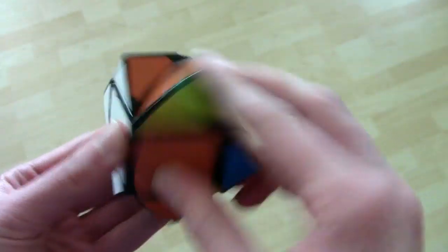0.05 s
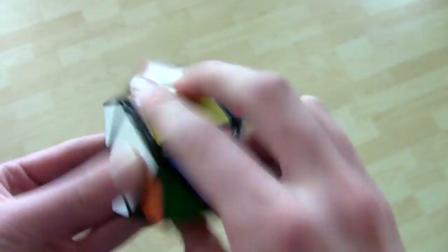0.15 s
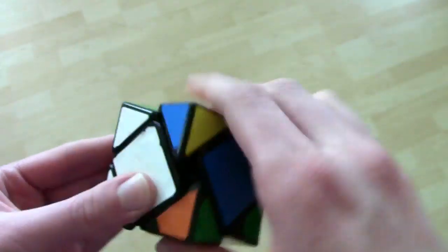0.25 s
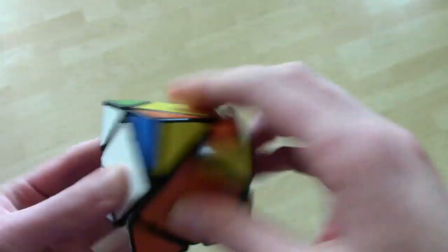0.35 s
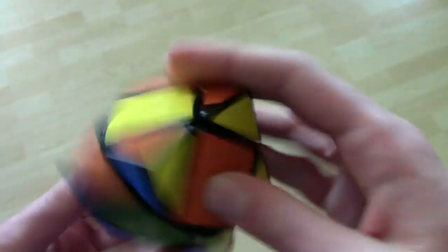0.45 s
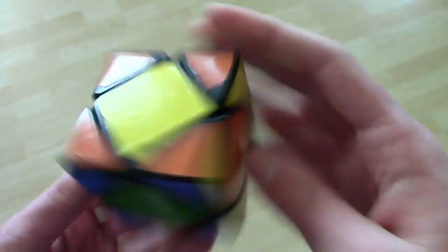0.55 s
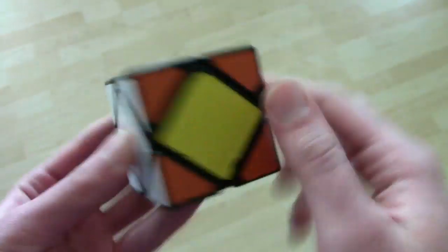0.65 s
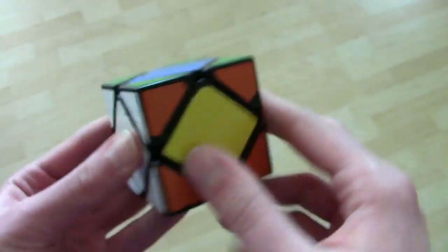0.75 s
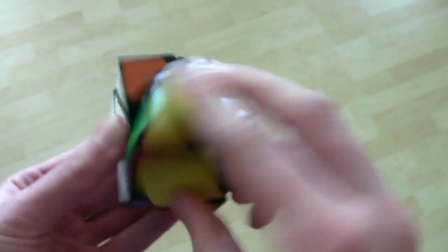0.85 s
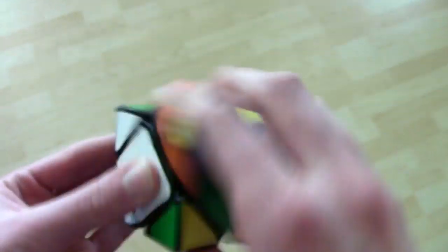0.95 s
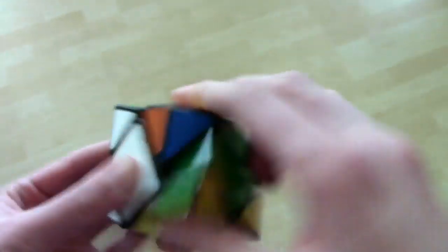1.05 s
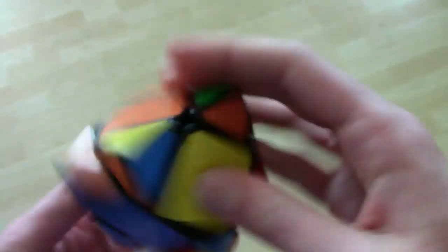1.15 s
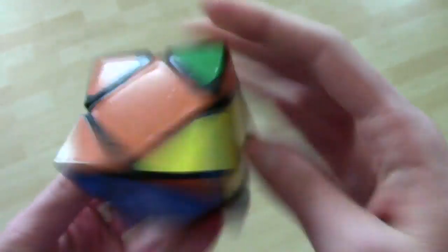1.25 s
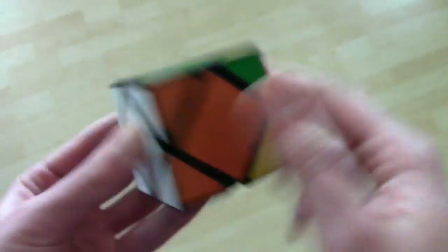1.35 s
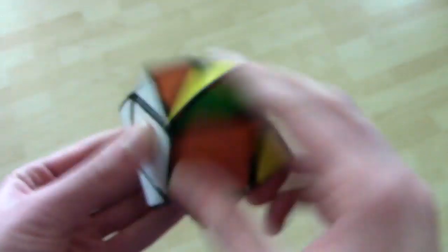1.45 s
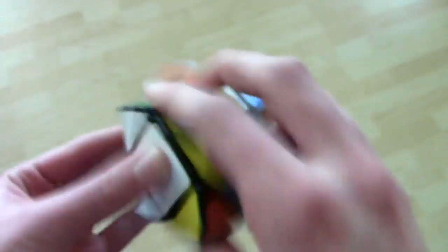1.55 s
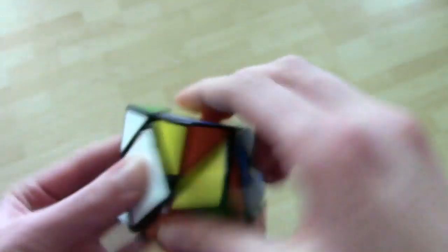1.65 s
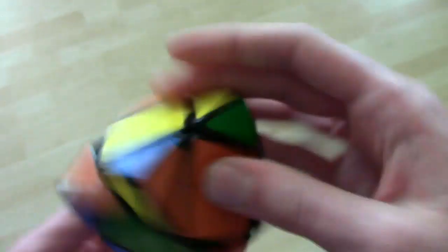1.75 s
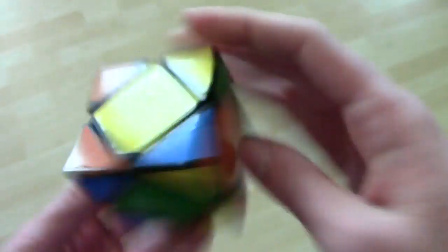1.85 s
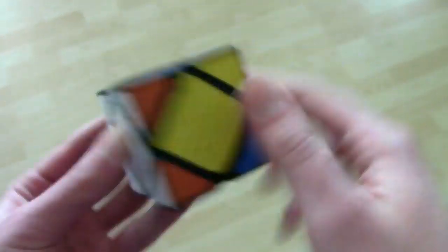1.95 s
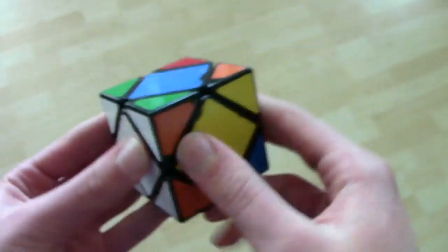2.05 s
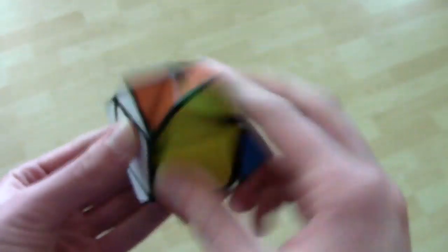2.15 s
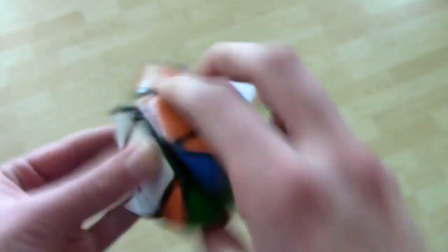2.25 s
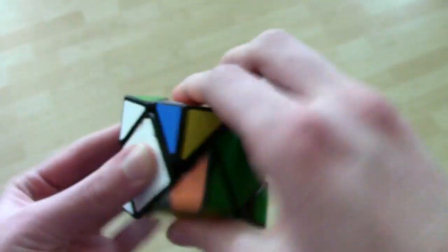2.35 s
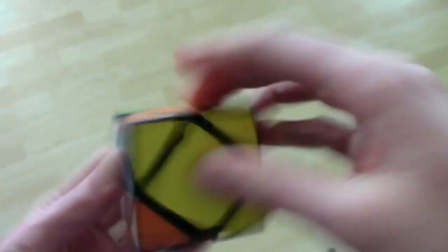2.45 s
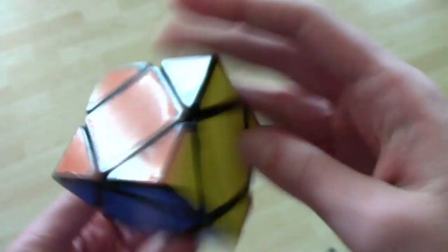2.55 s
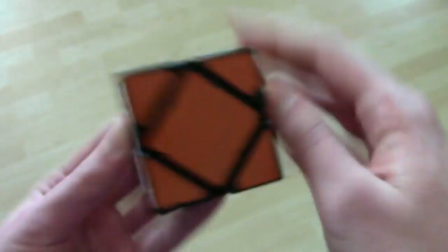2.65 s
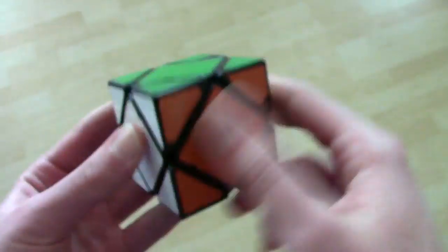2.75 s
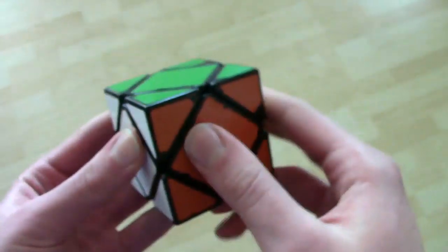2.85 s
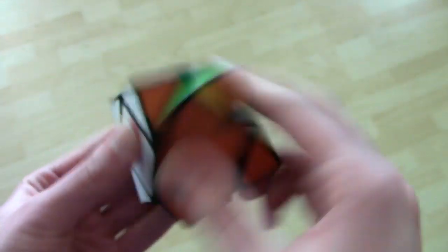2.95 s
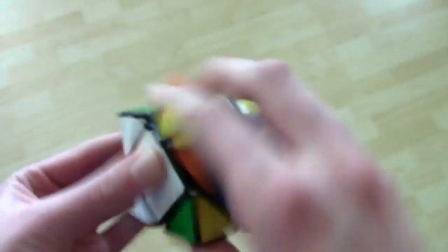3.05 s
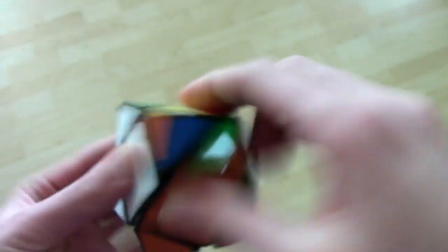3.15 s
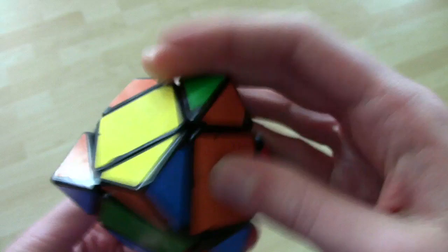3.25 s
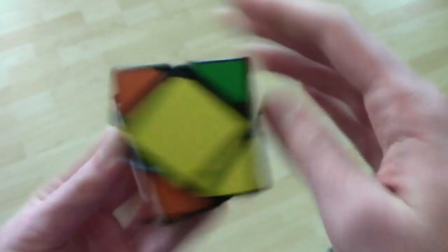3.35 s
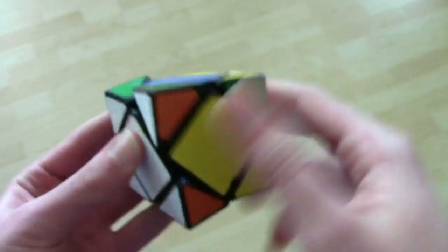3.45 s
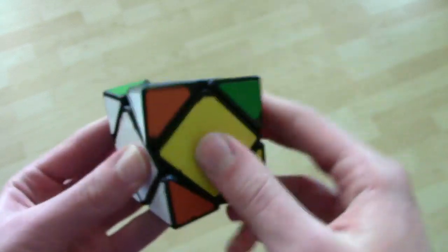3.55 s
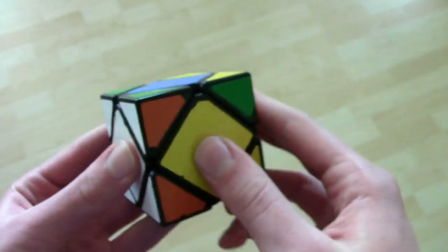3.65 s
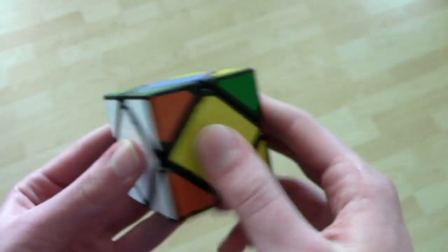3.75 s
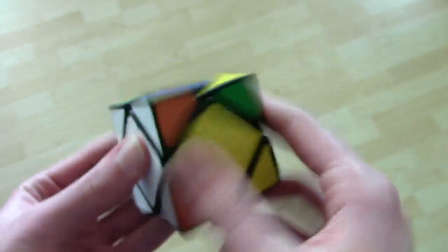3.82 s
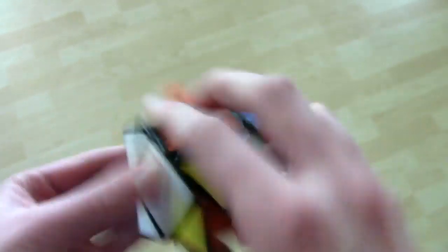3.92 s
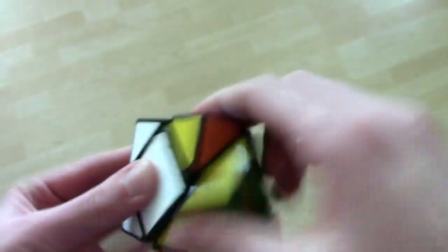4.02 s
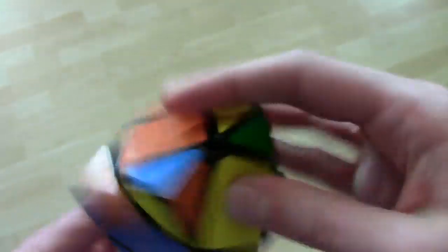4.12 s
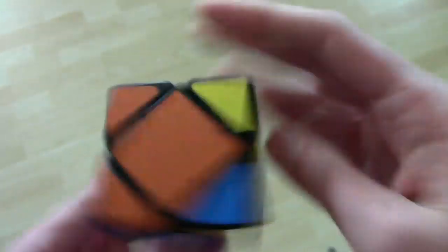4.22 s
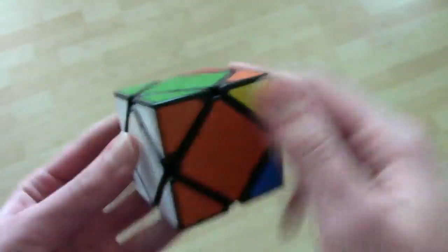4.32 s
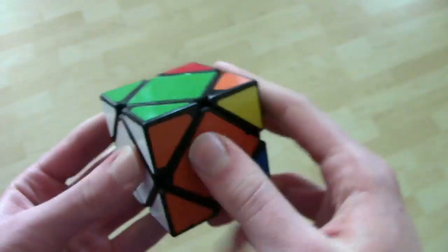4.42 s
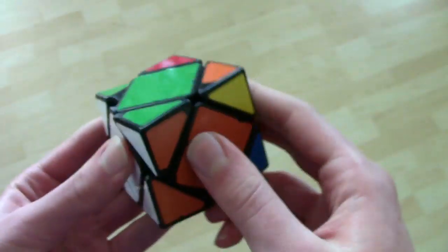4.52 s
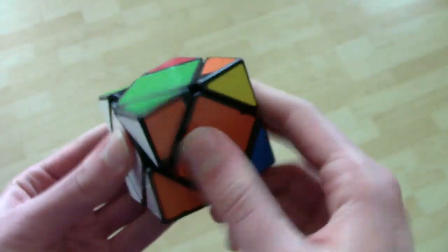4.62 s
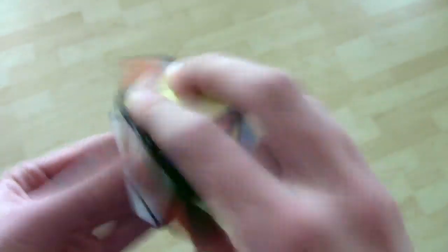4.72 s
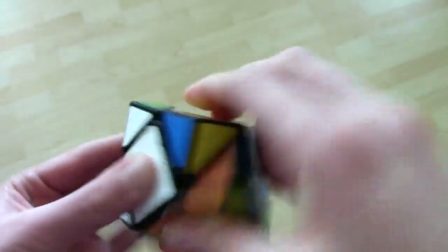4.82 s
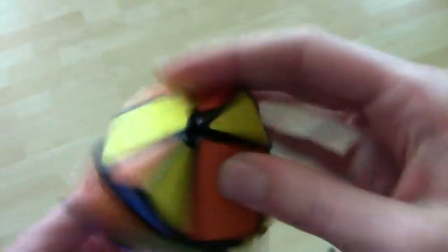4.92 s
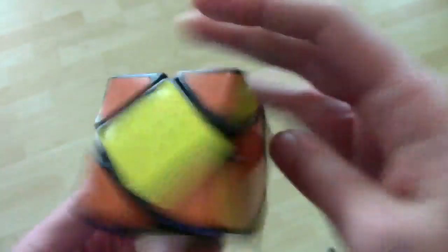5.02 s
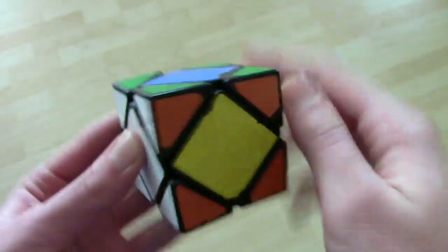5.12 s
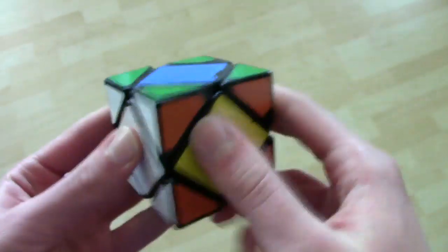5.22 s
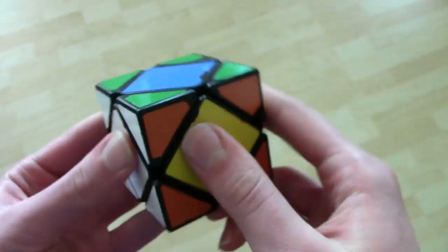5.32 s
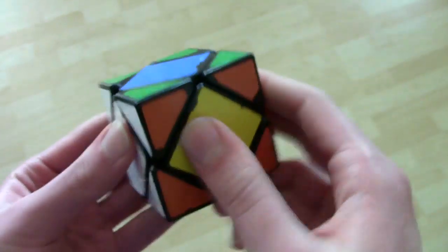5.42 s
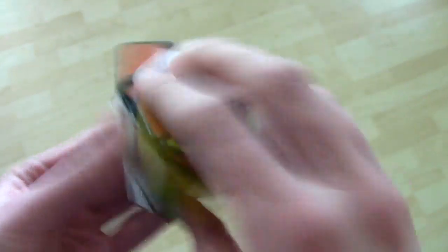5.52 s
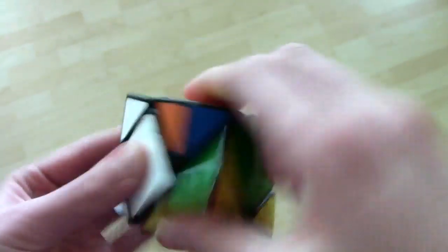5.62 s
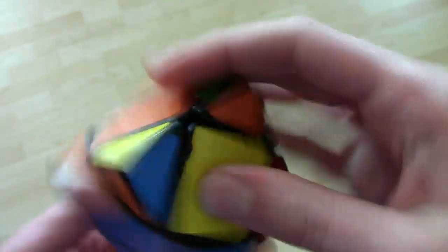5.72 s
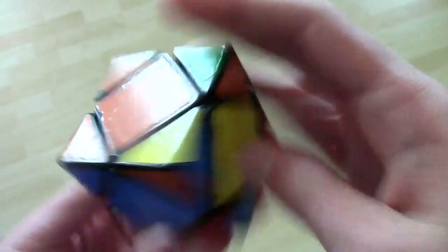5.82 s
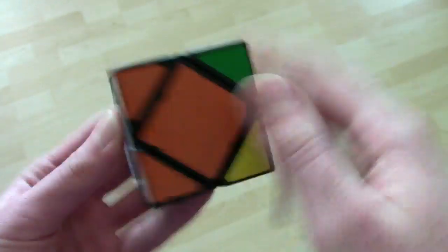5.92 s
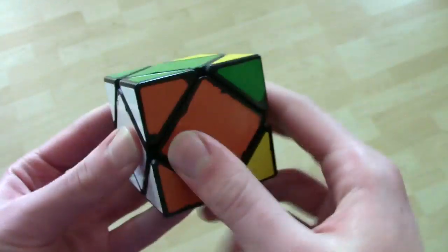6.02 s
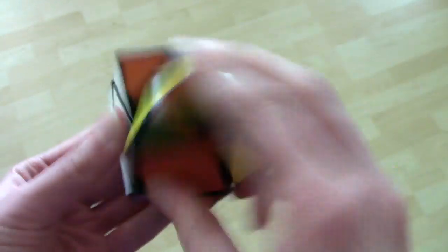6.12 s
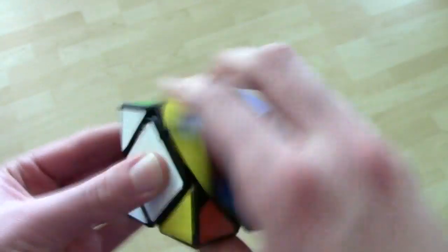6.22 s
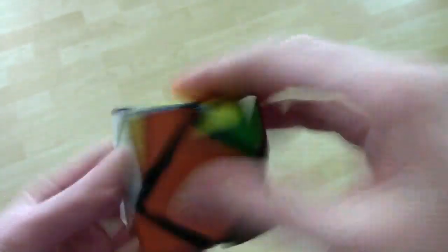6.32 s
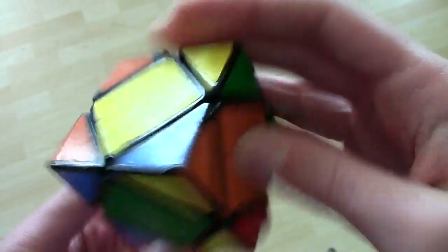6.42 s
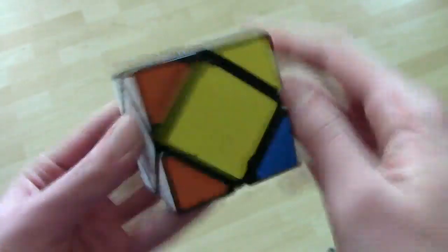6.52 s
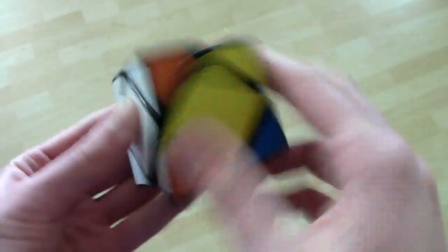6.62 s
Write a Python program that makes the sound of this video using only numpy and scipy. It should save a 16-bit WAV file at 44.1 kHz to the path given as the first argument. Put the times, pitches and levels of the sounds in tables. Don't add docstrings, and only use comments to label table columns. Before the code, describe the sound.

Fingers rapidly twist a hollow plastic puzzle up close, bright clicks and hollow clacks rattling in quick runs with short gaps over soft hiss.

```python
import sys
import numpy as np
from scipy import signal
from scipy.fft import rfft, irfft, next_fast_len
from scipy.io import wavfile
from scipy.ndimage import uniform_filter1d

SR = 44100
rng = np.random.default_rng(int(sys.argv[2]) if len(sys.argv) > 2 else 0)


def voltage_ratio(level):
    return 10 ** (np.asarray(level, float) / 20)


def to_wav(sig):
    pcm = np.clip(np.atleast_2d(sig), -1, 1) * 32767
    pcm = np.round(pcm).astype(np.int16)
    wavfile.write(sys.argv[1], SR, pcm.T)


N = 294390
LEAD_MS = 9


def along(points, hz):
    point_hz, value = np.transpose(points)
    return np.interp(np.log(hz + 1), np.log(point_hz + 1), value)


def filtered(x, response):
    size = next_fast_len(N + SR // 2)
    hz = np.fft.rfftfreq(size, 1 / SR)
    return irfft(rfft(x, size) * response(hz), size)[..., :N]


def resonances(modes, hz):
    total = 0
    for k, (center_hz, width_hz, db) in enumerate(modes):
        damping = 1j * hz * width_hz
        mode = damping / (center_hz * center_hz - hz * hz + damping)
        total = total + (-1) ** k * voltage_ratio(db) * mode
    return total


def high_pass(hz, corner_hz):
    return -hz * hz / (corner_hz ** 2 - hz * hz + 1.4j * hz * corner_hz)


# (frequency [Hz], level [dB per Hz])
HISS_TONE = [(35, -11), (60, -7), (66, -10), (130, -10), (593, -15), (6000, -28.5), (16000, -34)]
# (frequency [Hz], likeness [0 to 1])
HISS_LIKENESS = [(60, .75), (200, .1), (2000, .55)]


def hush():
    def shape(hz):
        turn = np.arccos(np.clip(along(HISS_LIKENESS, hz), -1, 1)) / 2
        return voltage_ratio(along(HISS_TONE, hz)) * np.array([np.cos(turn), np.sin(turn)])

    mid, side = filtered(rng.standard_normal((2, N)), shape)
    hiss = voltage_ratio(-54.5) * np.array([mid + side, mid - side]) / np.std(mid)
    t = np.arange(N) / SR
    hum = np.sin(2 * np.pi * 84.3 * t)
    passing = np.exp(-((t - 2.4) / .48) ** 4)
    return hiss + voltage_ratio(-56) * gain_control() * passing * hum / np.std(hum)


# (frequency [Hz], time [s])
ECHO_TIME = [(1200, 0.42), (5000, 0.42), (11000, 0.37), (15000, 0.43)]
# (frequency [Hz], level [dB])
ECHO_LEVEL = [(900, -14.5), (2500, -16.5), (5000, -16), (9000, -22.5), (15000, -24.5)]


def room(x):
    wet, step, build = np.zeros((3, N + SR)), SR // 5, .03 * SR
    for start in range(0, N, step):
        hz, t, z = signal.stft(rng.standard_normal((3, 3 * step)), SR, nperseg=256)
        fade = voltage_ratio(-60 * t / along(ECHO_TIME, hz)[:, None])
        tail = signal.istft(z * fade, SR, nperseg=256)[1]
        tail = tail * np.minimum(1, np.arange(tail.shape[1]) / build)
        tail = tail / np.linalg.norm(tail[0])
        answer = signal.fftconvolve(x[[0, 1, 0], start:start + step], tail, axes=1)
        wet[:, start:start + answer.shape[1]] += answer
    one, other, side = filtered(wet[:, :N], lambda hz: voltage_ratio(along(ECHO_LEVEL, hz)))
    return (one + other) / np.sqrt(2) + voltage_ratio(-14) * side * [[1], [-1]]


# (time [s], snap level [dB], knock level [dB], pitch of the struck edge [kHz])
FIRST_RUN = [(0.0847, -48, -30.5, 1.6), (0.0885, -57, -52, 2.7), (0.0939, -40.5, -50, 4.8),
             (0.1185, -22.5, -22, 2.9), (0.1321, -35, -25, 2), (0.1355, -12, -21, 7.1),
             (0.1392, -10, -22.0, 9.6), (0.1771, -25, -21, 3.3), (0.1875, -29.0, -29, 3.5),
             (0.1958, -7.0, -14, 9.1), (0.2111, -16, -19, 8.3), (0.217, -19.5, -16, 4.9),
             (0.2207, -30, -14, 3.3), (0.2358, -7.5, -13, 8.7), (0.2749, -24, -18.0, 4),
             (0.2951, -7, -18.5, 9.8), (0.3118, -25, -17, 6.2), (0.3175, -9, -15.5, 8.7),
             (0.3608, -39, -42, 4.1), (0.3785, -43.5, -35, 4.8), (0.4222, -13.0, -15.5, 8.6),
             (0.4272, -12, -13, 6.7), (0.4354, -7.5, -41, 9.5), (0.4446, -23, -8.5, 5.9),
             (0.4481, -10, -17, 5.3), (0.4519, -18, -13, 6.6), (0.4672, -11, -28, 10.8),
             (0.5131, -37, -23.5, 2.8), (0.5213, -22, -20.5, 2.4), (0.5368, -7, -18, 9.1),
             (0.5583, -14, -16.5, 12.4), (0.5636, -12, -12.5, 4.3), (0.5759, -9.0, -18.0, 8.4),
             (0.5998, -18.5, -44, 9.5), (0.6043, -25, -42, 7.8), (0.8127, -46.5, -34.5, 2.6)]
SECOND_RUN = [(0.8716, -26.0, -34, 4.8), (0.878, -35, -39, 7.2), (0.8832, -36.5, -33, 4.9),
              (0.8913, -39, -28, 8.4), (0.9063, -12.5, -11.5, 4.9), (0.915, -30, -25, 3.7),
              (0.9217, -6.5, -17, 9.2), (0.9506, -24, -17.5, 3.2), (0.9564, -21, -28, 4.5),
              (0.9662, -11.5, -17, 11.7), (0.9817, -27, -22.5, 5.5), (0.9918, -32, -24.0, 3.4),
              (1.0073, -7, -16, 9.3), (1.0275, -21, -17, 4.1), (1.033, -28, -30, 9), (1.0533, -14, -32, 10),
              (1.0811, -8, -16, 8.9), (1.1558, -37, -33, 6), (1.165, -10, -20, 8.9),
              (1.1802, -11, -13.5, 9.7), (1.1835, -7.5, -10, 5), (1.1899, -9.5, -13, 8),
              (1.2026, -13, -24, 8.5), (1.229, -21, -19.0, 7.8), (1.2342, -21, -26, 5.2),
              (1.241, -14, -34, 10.8), (1.2478, -11.5, -21, 9.9), (1.2558, -21.5, -11, 5.3),
              (1.2625, -11.5, -12, 4.9), (1.2748, -12.5, -28, 8.4), (1.2865, -25, -30.5, 7.3),
              (1.2946, -8, -19, 11.4), (1.304, -35, -30.5, 3.7), (1.3788, -44, -39, 5.6),
              (1.43, -42, -34.5, 2.8)]
THIRD_RUN = [(1.499, -36.5, -34, 10), (1.512, -32, -30, 5.2), (1.516, -34, -28.0, 3.4),
             (1.5244, -23.5, -18, 4), (1.5314, -14, -12, 3.9), (1.539, -9.5, -12.0, 2.6),
             (1.5535, -6.5, -19, 8.2), (1.5598, -11, -12, 7.3), (1.5785, -18, -16.5, 4.3),
             (1.5887, -22, -25, 5.8), (1.596, -16, -26, 11), (1.6015, -20.0, -30.0, 8.9),
             (1.6159, -26.0, -21, 4.7), (1.6399, -6, -15.5, 8.6), (1.6472, -13, -15, 8.9),
             (1.6516, -10.0, -14, 7.3), (1.6564, -20, -11, 6.3), (1.6674, -14, -29, 8.7),
             (1.6933, -9.5, -11.5, 8.2), (1.7018, -24, -22, 4.1), (1.7205, -19, -39, 7.5),
             (1.7417, -29, -26, 5.4), (1.7805, -8.5, -15, 4.76), (1.7918, -18.5, -17.5, 3.7),
             (1.806, -8, -20, 9.2), (1.826, -10, -26, 8), (1.8345, -20.0, -17.5, 3.1),
             (1.847, -11.5, -17, 8.8), (1.8734, -8.0, -16.5, 8.5), (1.8961, -13.5, -27, 9.1),
             (1.9394, -18, -26.5, 7.9), (2.0373, -22.5, -19.5, 7.5), (2.1005, -36, -26.5, 7.3),
             (2.1079, -44, -31, 3.0), (2.1257, -35.5, -39.5, 7.1)]
FOURTH_RUN = [(2.1715, -48, -41.5, 2.6), (2.1819, -41.5, -45.5, 7.7), (2.1955, -36.0, -38.0, 7.9),
              (2.208, -33, -20.5, 2.3), (2.219, -38, -22.5, 3.3), (2.225, -30, -25, 2.2),
              (2.2293, -21.0, -15.5, 4.2), (2.255, -6, -20, 9.1), (2.2734, -7.5, -11.5, 5.5),
              (2.2793, -11, -16.5, 4.2), (2.2822, -20, -19.5, 9.7), (2.2966, -18.5, -25, 10.5),
              (2.328, -34, -35, 5.2), (2.344, -6.5, -13.5, 10.5), (2.3531, -10.5, -15, 4.3),
              (2.3598, -10.0, -10.5, 5.9), (2.3686, -16, -21.5, 10), (2.3853, -17, -27, 7.7),
              (2.4108, -7.5, -12.5, 8.7), (2.439, -40, -35, 4.7), (2.4588, -24, -35, 9.5),
              (2.4806, -33, -34, 4.4), (2.4874, -23, -27, 3.9), (2.5068, -18.5, -14.5, 6.1),
              (2.5107, -10, -9.5, 4.2), (2.523, -15.0, -12, 2.5), (2.5372, -9, -19.5, 8.9),
              (2.5506, -18, -16, 7.7), (2.5617, -14.5, -27.5, 8.7), (2.576, -25, -16.5, 6.1),
              (2.5798, -16.5, -14.5, 3), (2.587, -17, -23, 5.8), (2.5914, -8, -22, 12),
              (2.5982, -23.5, -23, 3.1), (2.606, -15.5, -21, 6.2), (2.6135, -10, -15.5, 9.1),
              (2.6344, -14.5, -34, 9.4), (2.7294, -44, -36, 6), (2.7965, -29.5, -43.5, 2.1),
              (2.871, -50, -43.5, 4.8)]
FIFTH_RUN = [(3.03, -35, -38, 5.8), (3.038, -21.5, -20, 4.7), (3.0453, -20, -9.5, 5.6),
             (3.053, -11.5, -13, 4.9), (3.066, -8.0, -16.5, 8.6), (3.0826, -25, -21, 5.2),
             (3.089, -10.5, -13.0, 4.8), (3.102, -13.5, -16.5, 7.9), (3.1109, -18, -19, 3.4),
             (3.1246, -6.5, -13.5, 8.8), (3.1427, -21, -22.5, 7.7), (3.1623, -18, -33.0, 11),
             (3.191, -8.5, -13.5, 9.3), (3.2256, -21, -38, 8.4), (3.2506, -20, -26, 6.6),
             (3.257, -13, -17.5, 4.0), (3.2686, -13, -8.5, 5.9), (3.2823, -12, -20, 9.6),
             (3.3065, -14, -18.5, 4.6), (3.3201, -7.5, -14, 9.3), (3.3314, -7, -20.5, 8.2),
             (3.3371, -13.5, -10.5, 7.9), (3.3467, -10, -29, 7.4), (3.3975, -29.5, -31, 2.9),
             (3.4379, -39, -32.0, 6.4), (3.4613, -35.0, -28, 4.3), (3.4737, -35, -29, 3.3),
             (3.653, -51.0, -43, 3.9), (3.6616, -39, -43, 9.4), (3.6708, -32.5, -50, 8.6),
             (3.6748, -41, -31.5, 4.4), (3.729, -13.5, -32.5, 10), (3.7343, -8.5, -28, 7.1),
             (3.7406, -21.5, -33.0, 8.5)]
SIXTH_RUN = [(3.9044, -36, -33, 2.9), (3.917, -40, -28.5, 2.8), (3.921, -27.0, -38, 7.2),
             (3.9388, -12.5, -11, 4), (3.9467, -17.5, -16, 5.2), (3.9537, -7.0, -14.5, 9.8),
             (3.9736, -8.5, -14.5, 8.4), (3.9845, -14, -25, 9), (3.9977, -19, -17, 3.0),
             (4.0101, -7.5, -11, 8.7), (4.0276, -12.5, -14.5, 9.1), (4.044, -27, -38.0, 12),
             (4.0742, -9, -13, 7.3), (4.1161, -17.5, -43, 8.3), (4.1317, -27, -21.5, 4.6),
             (4.1428, -22, -26, 8.4), (4.1464, -9.0, -18.5, 4.9), (4.1503, -13, -25, 9.4),
             (4.156, -16, -14.5, 4.8), (4.1705, -10.5, -30, 8.7), (4.188, -34, -31.0, 5.8),
             (4.1974, -16.5, -16.0, 4.5), (4.2042, -27.5, -20, 4.8), (4.2098, -14.5, -20, 8.5),
             (4.226, -6.5, -11, 6.8), (4.2307, -12, -10.5, 4.9), (4.241, -10, -21, 8.7),
             (4.2624, -22, -38, 7.3), (4.311, -32.5, -33, 5.2), (4.3352, -31, -28.5, 4.4),
             (4.3707, -43, -32.5, 5.1), (4.4573, -50, -40, 4.7), (4.4846, -47, -38.5, 3.8),
             (4.5695, -46, -40, 4.5), (4.5844, -52, -37, 2.4), (4.5938, -60, -29.5, 2.6),
             (4.6091, -58, -41.5, 3.3), (4.6364, -63, -57, 3.1)]
SEVENTH_RUN = [(4.7215, -49, -37, 2.6), (4.729, -52.5, -41, 2.5), (4.7512, -29.5, -14.0, 5.4),
               (4.7591, -12, -11.5, 4.4), (4.7627, -23, -18, 2.4), (4.777, -8.5, -16.5, 9.0),
               (4.7834, -14, -14, 8.6), (4.7883, -12.5, -22, 6.4), (4.7939, -8, -12.5, 8.4),
               (4.8052, -22, -25, 8.6), (4.8299, -8, -18.0, 9.2), (4.8432, -16.5, -24.0, 8),
               (4.856, -20.5, -42, 9.9), (4.8935, -29, -17, 3.5), (4.8987, -8.5, -19.5, 9.1),
               (4.918, -25, -45, 8.1), (4.9506, -16.5, -22.5, 4.9), (4.9637, -27, -28.5, 2.8),
               (4.9688, -26, -28, 9.4), (4.9786, -8.5, -21, 9), (4.9991, -18, -15.5, 4.8),
               (5.0113, -15, -18.5, 4.4), (5.0189, -17.5, -13, 2.5), (5.0225, -8.5, -19, 8.3),
               (5.0299, -21.5, -16, 2.3), (5.035, -23.5, -16.5, 3.3), (5.0404, -12, -11.0, 5.5),
               (5.0509, -9, -20, 8.9), (5.0969, -27, -28.5, 4.9), (5.1556, -33, -29.0, 2.3),
               (5.1759, -42, -30.5, 3.6), (5.2819, -45.5, -41, 2.9), (5.335, -45, -21, 7),
               (5.3496, -8, -30, 9.03), (5.3558, -37, -44.5, 10)]
EIGHTH_RUN = [(5.483, -46, -49, 7.0), (5.5412, -35, -26, 4.5), (5.549, -18.5, -15.5, 3),
              (5.557, -35, -23, 3.8), (5.5634, -8.5, -13, 6.3), (5.5773, -7.5, -17, 9.5),
              (5.5894, -8, -9.5, 8.1), (5.5985, -11.5, -16, 5.1), (5.6225, -20, -19.5, 3.8),
              (5.6393, -9.5, -23, 8.6), (5.6516, -13, -11, 8.2), (5.664, -22, -38, 12),
              (5.684, -39, -35, 4.8), (5.6912, -13.0, -18.5, 8.1), (5.717, -24.5, -20, 4.2),
              (5.7332, -14.5, -32, 9.1), (5.7537, -29, -27.0, 3.3), (5.7604, -11.5, -12, 4.3),
              (5.7662, -11, -29, 5.1), (5.7702, -13.0, -6.5, 3.8), (5.7864, -10.5, -30, 9.1),
              (5.8026, -24, -21, 5.1), (5.8083, -10, -16.5, 4.6), (5.8153, -14, -16, 4.4),
              (5.8278, -10.5, -16.5, 6.3), (5.8338, -13, -14, 8.2), (5.844, -9.5, -20, 9),
              (5.859, -10.5, -17.5, 7.9), (5.9114, -12, -43, 9.4), (5.999, -42, -35, 3.5),
              (6.02, -25.5, -32, 5.3), (6.0265, -40, -20, 3.4), (6.0471, -34, -32.0, 2.9)]
NINTH_RUN = [(6.1297, -50, -42.0, 4.8), (6.139, -52.0, -43, 3.1), (6.167, -28, -32, 4.4),
             (6.174, -43, -40, 3.1), (6.1904, -23, -11.5, 2.4), (6.1942, -12.0, -8, 4.5),
             (6.2059, -29, -12, 3.8), (6.2122, -8, -27, 8.6), (6.2356, -13.5, -13, 5.3),
             (6.2397, -24, -29, 3.1), (6.247, -12.5, -25.0, 10.3), (6.2644, -19, -19, 1.9),
             (6.2707, -26, -22, 4.1), (6.2826, -9.0, -16.5, 9.7), (6.2954, -13, -15, 8.4),
             (6.3217, -26, -37.0, 7.3), (6.3572, -9, -12, 8.5), (6.3773, -15.0, -37.5, 8.2),
             (6.4084, -9.5, -15.5, 4.7), (6.4176, -13.5, -11, 5), (6.4297, -8, -16, 8.2),
             (6.446, -17, -20.5, 4.9), (6.4483, -26, -26.5, 6.0), (6.4541, -25, -20, 7.3),
             (6.466, -11.5, -24, 9), (6.4707, -11, -19, 10.2), (6.4829, -20, -11, 4.4),
             (6.493, -8.5, -17.5, 8.1), (6.5085, -46, -41, 3.4), (6.5188, -21, -35, 9.1),
             (6.5545, -39, -39, 5.6), (6.564, -36, -31.0, 7), (6.6365, -10.5, -15, 4.7),
             (6.64, -27, -17.5, 6.4), (6.657, -41, -30, 2.8), (6.6624, -15.5, -22.5, 7.6)]


def catches():
    early = FIRST_RUN + SECOND_RUN + THIRD_RUN
    middle = FOURTH_RUN + FIFTH_RUN + SIXTH_RUN
    return early + middle + SEVENTH_RUN + EIGHTH_RUN + NINTH_RUN


def burst(chance, half_ms, spiky_db):
    since_ms = np.arange(chance.shape[-1]) * 1000 / SR - LEAD_MS
    before = since_ms < 0
    hump = np.exp(-np.abs(since_ms / half_ms) ** np.where(before, 2.6, 1.8))
    scrape = 0.32 * voltage_ratio(2 * since_ms)
    rattle = 0.28 * voltage_ratio(-0.94 * since_ms)
    rubbing = np.where(before, scrape, rattle)
    return (hump + rubbing) * chance[0] * voltage_ratio(spiky_db * chance[1])


def struck(impacts, response, db):
    ring = irfft(rfft(impacts) * response)
    return voltage_ratio(db + 21.0) * ring / np.linalg.norm(ring, axis=1, keepdims=True)


# (frequency [Hz], width [Hz], level [dB])
EDGE_MODES = [(3240, 1800, 5), (4810, 550, 7), (6830, 1400, 3), (8580, 880, 10.5), (10090, 1540, 5),
              (14800, 1800, 1)]
# (frequency [Hz], width [Hz], level [dB])
SHELL_MODES = [(871, 238, 0), (1325, 355, 0), (1747, 850, -5)]
# (frequency [Hz], width [Hz], level [dB])
FINGER_MODES = [(333, 220, -23)]


def puzzle():
    full_ms, longer_per_db, length_scatter = 2.5, .025, .15
    crowded = .3
    shell_shift = .08
    size = 1280
    out, hz, gain = np.zeros((3, N + size)), np.fft.rfftfreq(size, 1 / SR), gain_control()
    rows = catches()
    chance = rng.standard_normal((len(rows), 4, 3, size))
    spots = rng.standard_normal((len(rows), 10))
    times_ms = 1000 * np.array([0] + [row[0] for row in rows] + [N / SR])
    gaps_ms = np.minimum(np.diff(times_ms)[1:], np.diff(times_ms)[:-1])
    for (s, snap_db, knock_db, edge_khz), gap_ms, draw, spot in zip(rows, gaps_ms, chance, spots):
        stretch = np.exp(longer_per_db * max(snap_db, knock_db) + length_scatter * spot[9])
        half_ms = min(crowded * gap_ms, full_ms * stretch)
        edge_hz = 1000 * edge_khz
        edges = []
        for (center_hz, width_hz, db), luck in zip(EDGE_MODES, spot):
            octaves_away = abs(np.log2(center_hz / edge_hz))
            edges.append((center_hz, width_hz, db + 2 * luck - 5 * octaves_away))
        shell = []
        for (center_hz, width_hz, db), luck, shift in zip(SHELL_MODES, spot[6:], spot):
            shell.append((center_hz * 2 ** (shell_shift * shift), width_hz, db + 2.18 * luck))
        bright = resonances(edges, hz) + resonances([(edge_hz, 1500, 3)], hz)
        bright = high_pass(hz, 1800) * bright
        thud = voltage_ratio(4 * spot[5] - 2) * resonances(FINGER_MODES, hz)
        hollow = high_pass(hz, 588) ** 2 * resonances(shell, hz) + thud
        snap = struck(burst(draw[:2], half_ms, spiky_db=4), bright, snap_db)
        knock = struck(burst(draw[2:], .7 * half_ms, spiky_db=6), hollow, knock_db)
        start = round(s * SR)
        first = start - LEAD_MS * SR // 1000
        out[:, first:first + size] += (snap + knock) / gain[start]
    return out[:, :N]


def scene():
    clicks = puzzle()
    unlike = filtered(clicks[0], lambda hz: voltage_ratio(-10) * 1j * hz / (hz + 3000))
    return np.array([clicks[0] + unlike, clicks[0] - unlike]) + room(clicks[1:])


def gain_control():
    memory_s, threshold_db, duck_per_db = 0.094, -6.5, 3.5
    hold_s, recover_db_per_s = .025, 200
    s, snap_db, knock_db, _ = np.transpose(catches())
    ago = s[:, None] - s
    memory = np.where(ago >= 0, np.exp(-np.abs(ago) / memory_s), 0)
    recent = memory @ (voltage_ratio(2 * snap_db) + voltage_ratio(2 * knock_db))
    ducks_db = -duck_per_db * (10 * np.log10(recent) - threshold_db)
    db = np.zeros(N)
    climb_db = recover_db_per_s * np.maximum(0, np.arange(SR // 2) / SR - hold_s)
    for start, duck_db in zip((s * SR).astype(int) - 260, ducks_db):
        part = db[start:start + SR // 2]
        part[:] = np.minimum(part, duck_db + climb_db[:len(part)])
    return voltage_ratio(uniform_filter1d(db, size=200))


def thin_stereo(x, spare_db=-38, keep=0.21):
    mid, side = (x[0] + x[1]) / 2, (x[0] - x[1]) / 2
    hz, t, z = signal.stft(side, SR, nperseg=2048)
    power = uniform_filter1d((mid - mid.mean()) ** 2, size=2048)
    loud_db = 10 * np.log10(np.abs(power) + 1e-9)
    loud_db = np.interp(t, np.arange(N) / SR, loud_db)
    share = np.clip(0.5 - (loud_db - spare_db) / 8, keep, 1)
    band_luck = uniform_filter1d(rng.random((28, len(t))), size=2, axis=1)
    luck = band_luck / 2 + rng.random(len(t)) / 2
    band = np.minimum(27, (28 * np.sqrt(hz / 17000)).astype(int))
    kept = (luck[band] < share + .1) | (hz[:, None] < 450)
    side = signal.istft(z * kept, SR, nperseg=2048)[1][:N]
    return np.array([mid + side, mid - side])


def thin_top(x, spare_db=-30, rich_db=-45):
    hz, t, z = signal.stft(x, SR, nperseg=2048)
    level_db = 10 * np.log10(np.sum(np.abs(z[0, 24:]) ** 2, axis=0) + 1e-12)
    luck = np.repeat(rng.random((172, len(t))), 6, 0)[:len(hz)]
    height = np.clip((hz[:, None] - 11000) / 5200, 0, 1) ** 1.5
    odds = height * (level_db < spare_db) * np.where(level_db > rich_db, 1, .4)
    return signal.istft(z * (luck > odds), SR, nperseg=2048)[1][:, :N]


def low_pass(x):
    return signal.sosfilt(signal.butter(12, 16810, fs=SR, output="sos"), x)


def record(dry):
    offset, ceiling = .0118, .84
    x = (dry + offset) * gain_control() + hush()
    x = x / (1 + np.abs(x / ceiling) ** 4) ** (1 / 4)
    x = filtered(x, lambda hz: np.where(hz < 15800, 1, voltage_ratio(-32)) * (hz < 16800))
    mix = thin_top(thin_stereo(x))
    return low_pass(mix)


dry = scene()
out = record(dry)
to_wav(out)
```